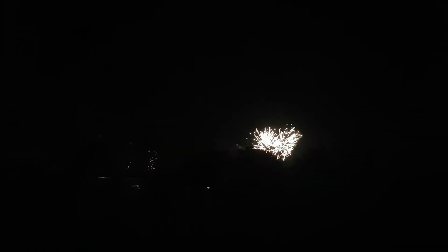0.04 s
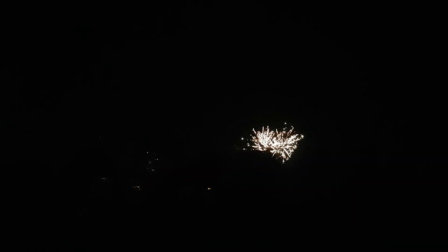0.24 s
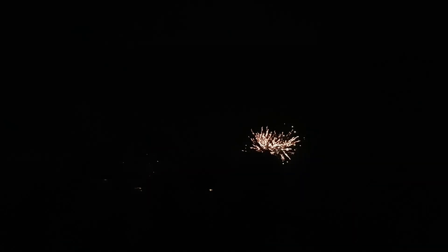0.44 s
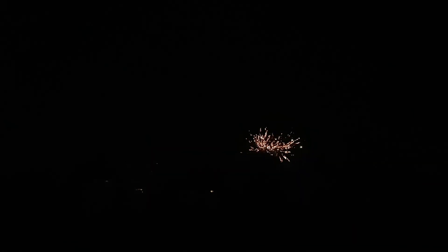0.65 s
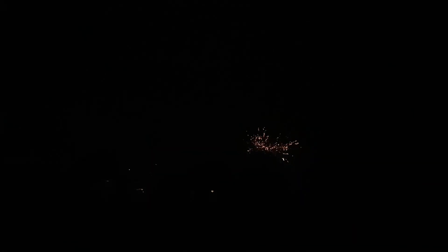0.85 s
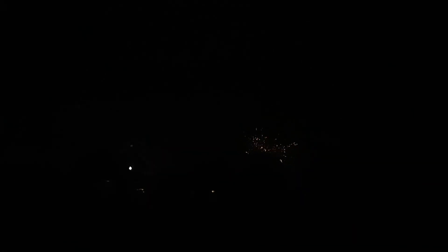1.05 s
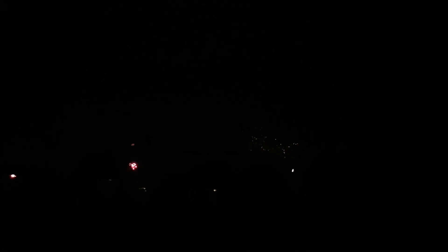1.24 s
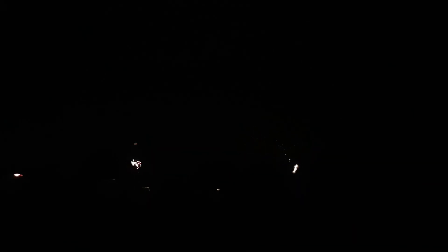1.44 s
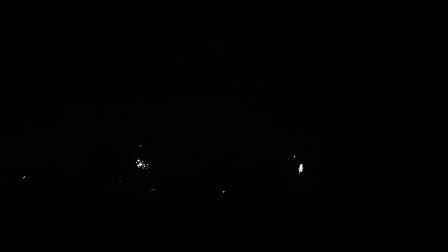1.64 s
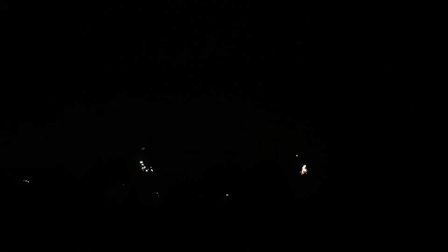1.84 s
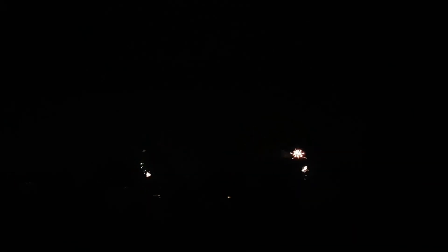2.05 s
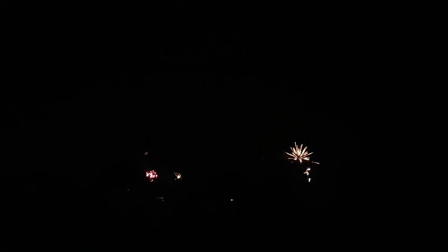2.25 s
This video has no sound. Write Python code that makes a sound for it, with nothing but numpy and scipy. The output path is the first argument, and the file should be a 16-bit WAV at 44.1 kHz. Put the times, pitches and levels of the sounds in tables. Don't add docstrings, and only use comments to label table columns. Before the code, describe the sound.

Firework bangs and crackle outdoors, picked up from afar by two spaced microphones: a quick crackling burst with hard cracks, one low boom, then clustered muffled bangs echoing off walls over faint far pops.

```python
import sys
import numpy as np
from scipy import signal
from scipy.fft import rfft, irfft, next_fast_len
from scipy.io import wavfile
from scipy.ndimage import map_coordinates

SR = 44100
rng = np.random.default_rng(int(sys.argv[2]) if len(sys.argv) > 2 else 0)


def master(y):
    cut = np.clip(np.atleast_2d(y).T, -1, 1)
    pcm = np.round(cut * 32767)
    wavfile.write(sys.argv[1], SR, pcm.astype(np.int16))


def magnitude_from_level(level_db):
    exponent = np.asarray(level_db, float) / 20
    return 10 ** exponent


N = 101430


def unit(x):
    return x / np.sqrt(np.mean(x ** 2) + 1e-20)


def along(points, hz):
    f, v = np.transpose(points)
    return np.interp(np.log(hz + 1), np.log(f + 1), v)


def curve(rows):
    return np.interp(np.arange(N) / SR, *np.transpose(rows))


def wobble(rate_hz):
    knots = rng.standard_normal(int(N * rate_hz / SR) + 4)
    return map_coordinates(knots, [np.arange(N) * rate_hz / SR])


def filtered(x, response):
    m = next_fast_len(x.shape[-1] + 8192)
    return irfft(rfft(x, m) * response(np.fft.rfftfreq(m, 1 / SR)), m)[..., :x.shape[-1]]


def resonance(hz, centre_hz, width_hz):
    return 1j * hz * width_hz / (centre_hz ** 2 - hz * hz + 1j * hz * width_hz)


def ports(hz, lag_ms, shade):
    # hz, level_db
    shadow = [(200, 3.5), (1000, -6.5), (4000, -8.5), (10000, -3.5)]
    side = np.array([[.5], [-.5]])
    return magnitude_from_level(shade * side * along(shadow, hz)) * np.exp(-2j * np.pi * hz * side * lag_ms / 1000)


def town_tail(seconds, stretch):
    # hz, t60_s
    decay = [(60, 8), (200, 1.27), (800, 1.18), (3000, 1.3), (9000, 0.42)]
    hz, t, z = signal.stft(rng.standard_normal((2, int(seconds * SR))), SR, nperseg=512)
    share = np.clip(hz / 1400, 0, 1)[:, None]
    z = np.array([z[0] + share * z[1], z[0] - share * z[1]])
    z *= magnitude_from_level(-60 * t / (stretch * along(decay, hz)[:, None]))
    tail = signal.istft(z, SR, nperseg=512)[1]
    return tail / np.linalg.norm(tail[0])


def pops(spectrum, strength, rate_hz, spread_db, lags_ms, wet, flutter_db):
    level = magnitude_from_level(curve(strength) + flutter_db * (wobble(16) + 0.46 * wobble(54.87)))
    colour = lambda f: magnitude_from_level(along([(20, -61)] + spectrum + [(16000, -100)], f))
    out = np.zeros((2, N))
    for lag_ms in lags_ms:
        train = (rng.random(N) < rate_hz / SR).astype(float)
        train *= magnitude_from_level(spread_db * np.minimum(rng.exponential(size=N), 2.8))
        train *= np.sign(rng.random(N) - .5)
        out += filtered(unit(train), lambda f: colour(f) * ports(f, lag_ms, 0.87))
    blur = signal.fftconvolve(out[:1], town_tail(0.051, 0.14), axes=1)[:, :N]
    return level * unit(unit(out) + wet * unit(blur))


def clusters(rows, cycles, noisy, scatter, gain_db, lag_ms, shade):
    out, t = np.zeros(N + SR), np.arange(-2048, 4096) / SR
    for s, db, hz in rows:
        u = t * hz / cycles
        tone = np.cos(2 * np.pi * (hz * t + scatter * rng.random())) * np.sqrt(2)
        band = lambda f: np.exp(-(np.log(f / hz + 1e-9) / 0.43) ** 2)
        grit = unit(filtered(rng.standard_normal(len(t)), band))
        swell = np.exp(-np.where(u < 0, 1.4 * u, 0.93 * u) ** 2)
        out[round(s * SR):][:len(t)] += magnitude_from_level(db + gain_db) * (tone + noisy * grit) * swell
    return filtered(out[2048:N + 2048], lambda f: ports(f, lag_ms, shade))


def wall_echoes(walls_db, walls_t60_s):
    path = np.zeros(SR // 2)
    at_s, size, turn = rng.random((3, 90))
    at_s = 0.00383 + 0.24 * at_s
    level = magnitude_from_level(walls_db - 60 * at_s / walls_t60_s - 3.7 * size)
    np.add.at(path, (at_s * SR).astype(int), level * np.sign(turn - .3))
    return path


def charges(rows, lead, front, damp, debris_db, debris_hz, ground_ms, ground_db,
            walls_db, walls_t60_s, town_db, stretch, shade):
    air_steep, debris_damp = 1.3, 0.78
    echo_hz, town_pan_db = 4200, -2.5
    before = 1024
    out, t = np.zeros((2, N + 2 * SR)), (np.arange(SR // 10) - before) / SR
    housing = lambda f: 1 + magnitude_from_level(-1) * resonance(f, 1870, 850)
    air = lambda f: np.exp(-(f / bright_hz / 2) ** air_steep) / (1 + 1j * f / bright_hz)
    for s, db, hz, bright_hz, lag_ms in rows:
        u = t * hz
        push = lead * np.clip(1 + u / front, 0, 1) ** 0.25
        rebound = -np.cos(2 * np.pi * (u - .12)) * np.exp(-damp * np.abs(u))
        blast = filtered(np.where(u < 0, push, rebound), air)
        spray = rng.standard_normal(len(t)) * (u > -front) * np.exp(-debris_damp * np.abs(u))
        spray = filtered(spray, lambda f: np.exp(-(f / debris_hz) ** 1.74))
        blast = magnitude_from_level(db) * filtered(blast + magnitude_from_level(debris_db) * spray, housing)

        echo = filtered(blast, lambda f: 1 / (1 + 1j * f / echo_hz) ** 2)
        near = signal.fftconvolve(echo, wall_echoes(walls_db, walls_t60_s))
        near[:len(t)] += blast + magnitude_from_level(ground_db) * np.roll(blast, int(ground_ms * SR / 1000))
        direct = filtered(near, lambda f: ports(f, lag_ms, shade))
        delayed = np.pad(echo, (300, 0))[None]
        wet = magnitude_from_level(town_db) * signal.fftconvolve(delayed, town_tail(0.98, stretch), axes=1)
        wet *= magnitude_from_level([[town_pan_db / 2], [-town_pan_db / 2]])
        i = round(s * SR) - before
        out[:, i:i + direct.shape[1]] += direct
        out[:, i:i + wet.shape[1]] += wet
    return out[:, :N]


def crackling_shell():
    # start_s, level_db
    shell_level = [(0, -46), (.15, -37), (.25, -26), (.33, -20), (.42, -22.5), (.48, -29), (.55, -31),
                   (.66, -43), (.88, -41), (1.0, -88)]
    # hz, level_db per Hz
    star_spectrum = [(200, -32), (340, -14.5), (750, -6), (1250, -11), (2150, -9), (3000, -18), (6300, -28),
                     (11000, -60.5)]
    return pops(star_spectrum, shell_level, rate_hz=500, spread_db=2.5, lags_ms=[.33, .31, -.25],
                wet=0.85, flutter_db=1.83)


def star_snaps():
    # start_s, level_db, pitch_hz
    snaps = [(0.117, -26.5, 2020), (0.154, -23.5, 1710), (0.211, -16, 2200), (0.241, -13, 2140),
             (0.255, -14, 1690), (0.272, -11, 1760), (0.3, -24, 1850), (0.309, -13, 2050), (0.32, -7, 1760),
             (0.339, -10.5, 1980), (0.349, -11, 2240), (0.36, -10, 1830), (0.454, -24, 1910),
             (0.523, -19, 2010), (0.556, -20, 1930), (0.822, -20.5, 1810), (1.068, -31.5, 1640),
             (1.412, -17, 1780), (1.521, -24.5, 2090), (1.688, -17, 1870), (1.72, -20.5, 1650),
             (2.068, -26, 1660), (2.198, -25.5, 2180), (2.29, -24.5, 2000)]
    return clusters(snaps, cycles=4.3, noisy=0.59, scatter=0.86, gain_db=-7.0, lag_ms=.31, shade=0.82)


def charges_ahead():
    # start_s, peak_db, pitch_hz, brightness_hz, left_lag_ms
    ahead = [(.3717, 3.5, 438, 3760, 0.054), (.3922, -9, 1500, 9000, -0.25),
             (.4180, -11, 674, 2500, -0.056), (.4105, -17, 1430, 6860, 0.32),
             (.4330, -8, 326, 2500, -0.00032), (.4422, -8, 315, 2500, 0.17),
             (.4945, -2.5, 470, 2600, 0.062), (.5410, -12.5, 594, 1800, -0.2), (.7010, -19, 380, 800, 0.18),
             (.8685, -15, 600, 900, -0.12), (.8935, -22, 810, 6140, 0.39),
             (1.8992, -18.5, 890, 1490, -0.18)]
    return charges(ahead, lead=0.91, front=0.35, damp=1.65, debris_db=-4.0, debris_hz=3040,
                   ground_ms=1.55, ground_db=-12.5, walls_db=-38.0, walls_t60_s=0.32,
                   town_db=-12.5, stretch=0.57, shade=0.75)


def charges_right():
    # start_s, peak_db, pitch_hz, brightness_hz, left_lag_ms
    right = [(1.3063, -1.5, 298, 1670, 0.27), (1.3270, -5.5, 199, 800, -0.15),
             (1.3425, -3, 268, 1500, 0.26), (1.3775, -12, 460, 1480, 0.15), (1.448, -9.5, 523, 1300, 0.058),
             (1.5715, -11.5, 317, 900, 0.42), (1.5985, -6, 475, 1500, 0.48),
             (1.6332, -1.5, 440, 1980, 0.38), (1.6870, -8, 1590, 2620, -0.19),
             (1.7030, -7.5, 490, 1610, 0.21), (1.803, -15.5, 512, 1205, 0.24),
             (1.9968, -8, 372, 1250, 0.28), (2.0115, -16.5, 347, 905, 0.29),
             (2.026, -13.5, 331, 1100, 0.41), (2.265, -22, 391, 1300, 0.42), (2.285, -17, 316, 1000, 0.091),
             (1.338, -6.5, 273, 790, -0.13)]
    return charges(right, lead=0.42, front=0.37, damp=3.15, debris_db=-15, debris_hz=3690,
                   ground_ms=2.7, ground_db=-9.0, walls_db=-13.5, walls_t60_s=0.54,
                   town_db=-5.5, stretch=0.69, shade=0.65)


def deep_boom():
    # start_s, peak_db, pitch_hz, brightness_hz, left_lag_ms
    boom = [
        (.7830, -8, 108.4, 1100, 0.01),
    ]
    # start_s, level_db, pitch_hz
    swing = [
        (.7887, -12, 105.5),
    ]
    out = charges(boom, lead=0.73, front=0.2, damp=2.3, debris_db=-6.5, debris_hz=2500,
                  ground_ms=3.0, ground_db=-11.5, walls_db=-15.5, walls_t60_s=0.39,
                  town_db=-5.5, stretch=0.17, shade=0.69)
    return out + clusters(swing, cycles=0.67, noisy=.05, scatter=0, gain_db=2, lag_ms=.01, shade=.3)


def boom_roll():
    level_db, t60_s, start_s, rise_s = -36, 8, .785, .03
    t = np.arange(N) / SR - start_s
    a, b = unit(filtered(rng.standard_normal((2, N)), lambda f: resonance(f, 100, 124) ** 2))
    level = magnitude_from_level(level_db - 60 * t / t60_s + 2.6 * wobble(9.67)) * np.clip(t / rise_s, 0, 1)
    return level * np.array([a + 0.12 * b, a - 0.36 * b])


def bass_lumps():
    # start_s, level_db, pitch_hz
    lumps = [(0.828, -20.5, 125), (0.865, -26, 122), (1.04, -32, 92.5), (1.094, -33, 108),
             (1.303, -35.5, 129), (1.341, -31, 139), (1.374, -24.5, 138), (1.596, -32.5, 127.5),
             (1.702, -31, 152), (1.832, -40.5, 109), (2.0, -35.5, 134), (2.037, -43, 134),
             (2.07, -43.5, 133)]
    return clusters(lumps, cycles=1.27, noisy=0.32, scatter=0, gain_db=-.5, lag_ms=.05, shade=0.37)


def crackling_string():
    # start_s, level_db
    string_level = [(.7, -88), (.8, -36.5), (1.0, -45.5), (1.295, -52.5), (1.32, -30), (1.429, -31.5),
                    (1.5, -36.5), (1.6, -37.5), (1.69, -27.5), (1.75, -42), (1.92, -49.5), (2.1, -43),
                    (2.2, -35.5), (2.3, -37)]
    # hz, level_db per Hz
    distant_spectrum = [(200, -30), (330, -25), (700, -6), (1300, -11.5), (2200, -14), (3200, -21),
                        (6000, -34), (10000, -73)]
    return pops(distant_spectrum, string_level, rate_hz=500, spread_db=-2.0, lags_ms=[.32, .29, -.22],
                wet=0.66, flutter_db=-1.1)


def far_thuds():
    # start_s, level_db, pitch_hz
    thuds = [(0.074, -28, 440), (0.156, -28.5, 576), (0.199, -23, 650), (0.256, -20, 580),
             (0.269, -20, 690), (0.279, -14.5, 750), (0.319, -13, 735), (0.333, -6, 890), (0.352, -19, 740),
             (0.522, -20, 510), (0.795, -17.5, 517), (0.809, -18.5, 540), (0.823, -22, 540),
             (0.851, -17, 670), (1.131, -33, 600), (1.355, -16.5, 400), (1.372, -21, 480),
             (1.408, -22, 472), (1.457, -10, 620), (1.467, -24, 580), (1.475, -26, 483), (1.61, -31, 460),
             (1.655, -25.5, 585), (1.667, -29, 596), (1.717, -19.5, 680), (1.82, -23, 496),
             (1.989, -30, 477), (2.074, -24.5, 560), (2.28, -26.5, 434), (2.292, -24, 623)]
    return clusters(thuds, cycles=1.06, noisy=.4, scatter=1, gain_db=-5.0, lag_ms=0.38, shade=1.0)


def far_barrage():
    # start_s, level_db
    barrage_level = [(0, -32), (.1, -40), (.2, -32.5), (.35, -28.5), (.43, -22.5), (.485, -28.5),
                     (.53, -27), (.62, -37), (.9, -37), (1.0, -44), (1.14, -36), (1.28, -41),
                     (1.359, -34.5), (1.47, -28), (1.58, -31.5), (1.66, -28), (1.8, -32.5), (1.918, -38.5),
                     (2.05, -34), (2.22, -39), (2.3, -27.5)]
    # hz, level_db per Hz
    far_spectrum = [(40, -31), (130, -28), (230, -13), (320, -6.5), (650, -12), (1100, -18), (2300, -21),
                    (9000, -69.5)]
    return pops(far_spectrum, barrage_level, rate_hz=320, spread_db=2.0, lags_ms=[.3, .15, -.1],
                wet=0.55, flutter_db=3.0)


def whistler():
    pitch_hz, width_hz, level_db, start_s, rise_s = 3040, 420, -52, 1.01, 0.28
    peak = lambda f: ports(f, 0.25, 0.39) / (1 + ((f - pitch_hz) / width_hz * 2) ** 4)
    rise = np.clip((np.arange(N) / SR - start_s) / rise_s, 0, 1)
    return magnitude_from_level(level_db + wobble(7.6)) * rise * unit(filtered(rng.standard_normal((2, N)), peak))


def scene():
    near = crackling_shell() + star_snaps() + charges_ahead() + charges_right()
    low = deep_boom() + boom_roll() + bass_lumps()
    far = crackling_string() + far_thuds() + far_barrage() + whistler()
    return near + low + far


def low_pass(x):
    return signal.sosfilt(signal.butter(12, 16100, fs=SR, output="sos"), x)


def record(dry):
    hiss_db, rolloff_hz, ceiling = -84.5, 45, 1.5
    x = filtered(dry, lambda f: (1j * f / rolloff_hz) ** 2 / (1 + 1j * f / rolloff_hz) ** 2)
    x = x + magnitude_from_level(hiss_db) * rng.standard_normal(dry.shape)
    mix = x / (1 + np.abs(x / ceiling) ** 8) ** (1 / 8)
    return low_pass(mix)


dry = scene()
out = record(dry)
master(out)
```